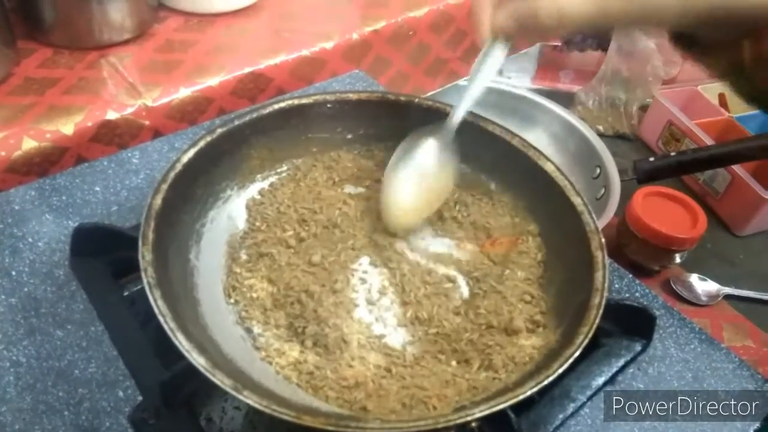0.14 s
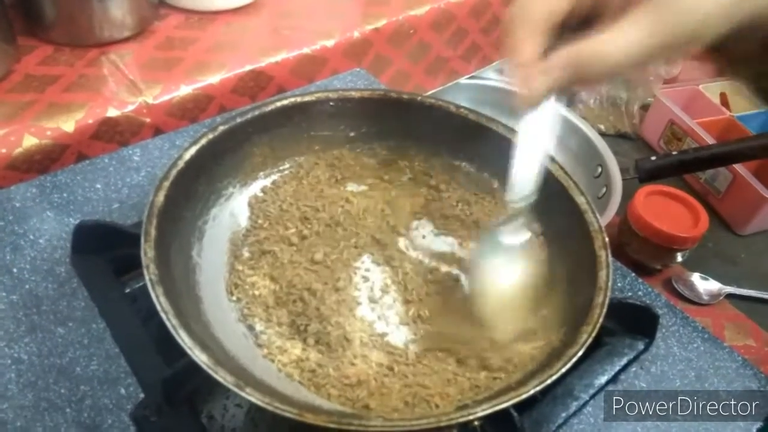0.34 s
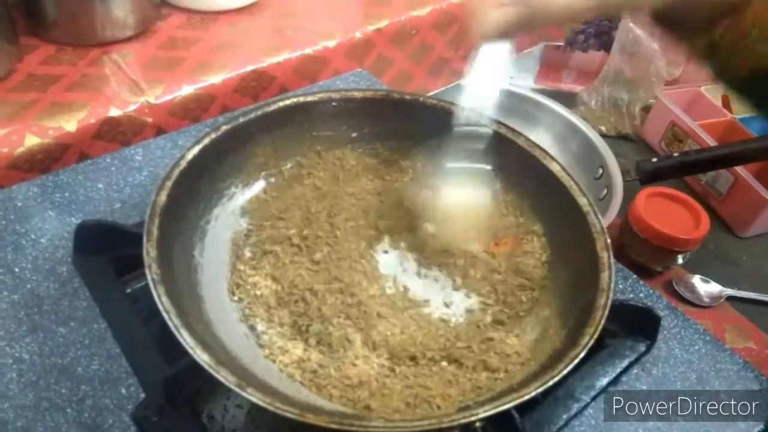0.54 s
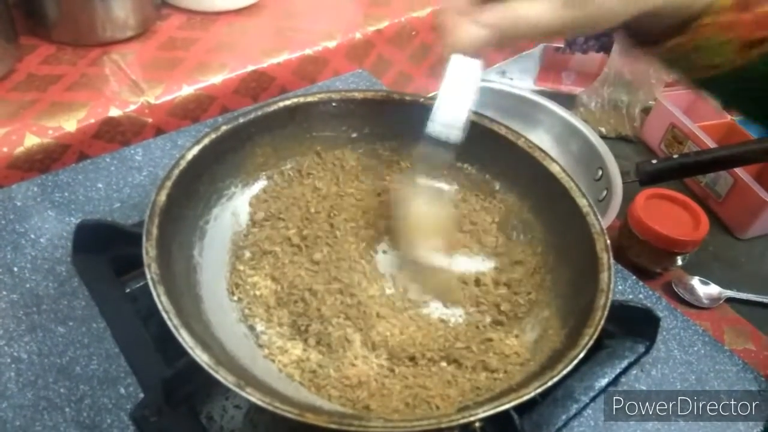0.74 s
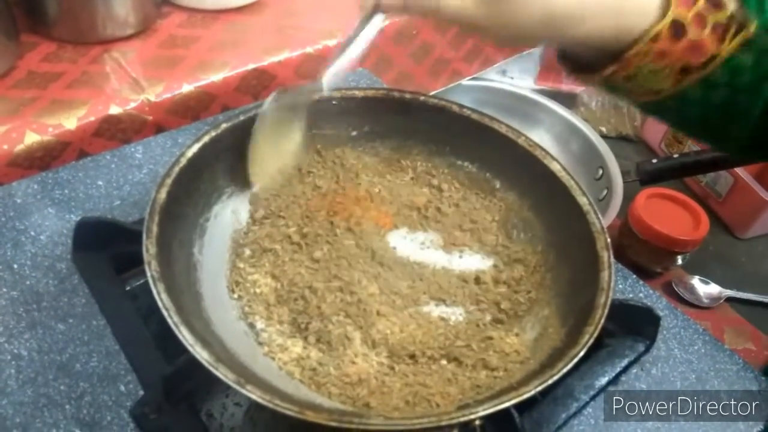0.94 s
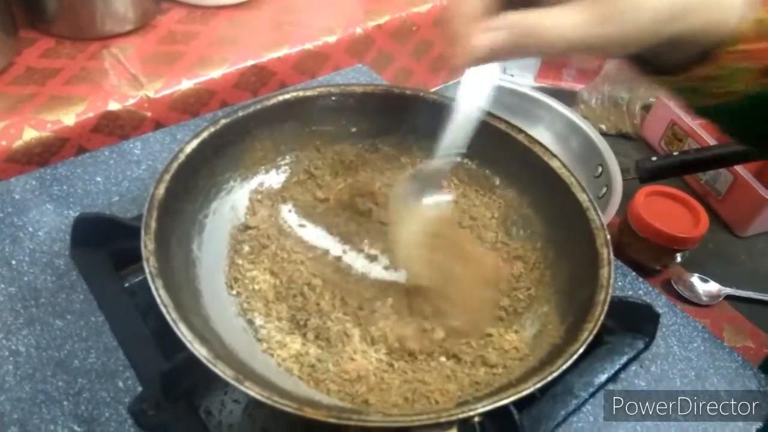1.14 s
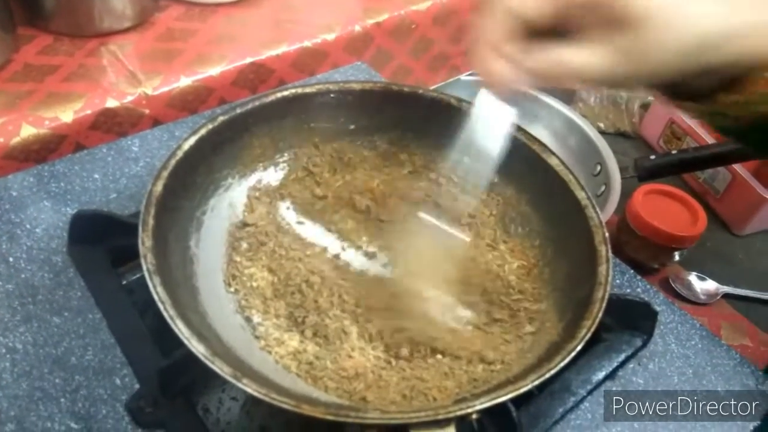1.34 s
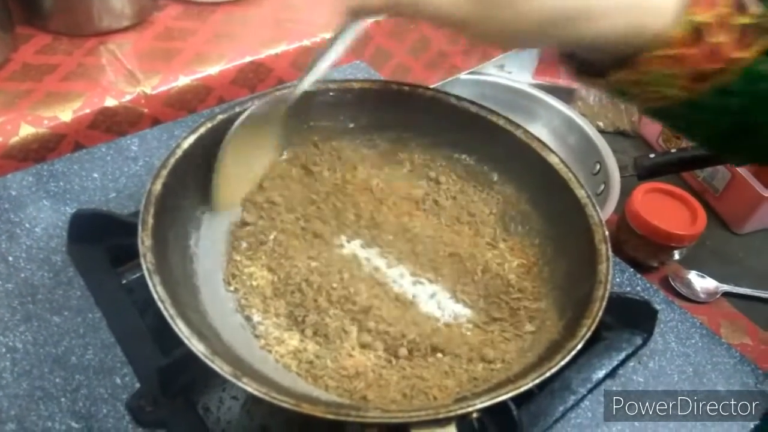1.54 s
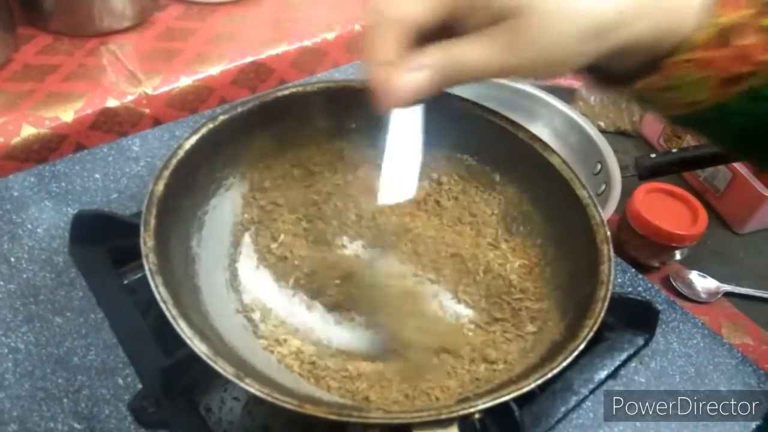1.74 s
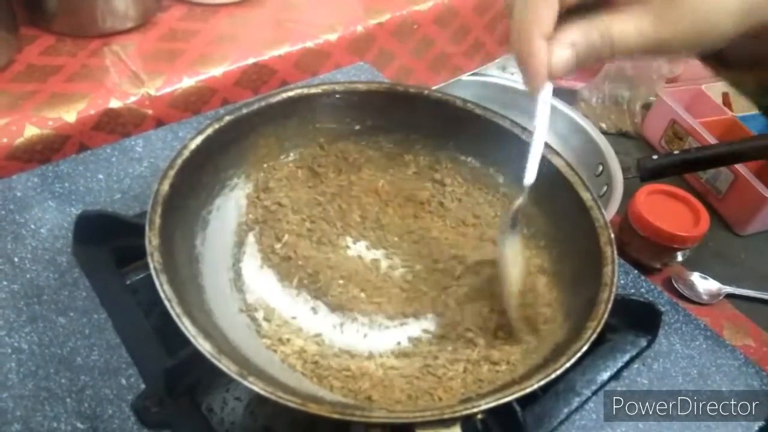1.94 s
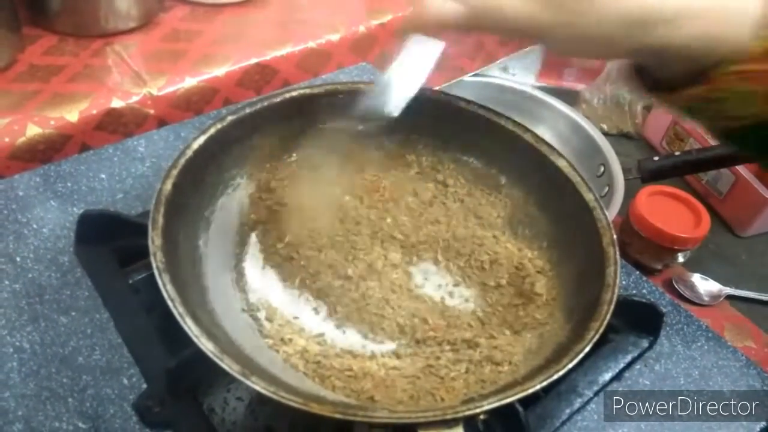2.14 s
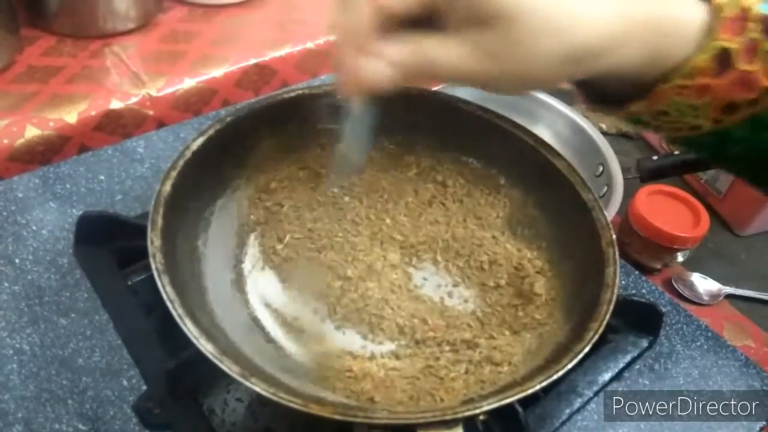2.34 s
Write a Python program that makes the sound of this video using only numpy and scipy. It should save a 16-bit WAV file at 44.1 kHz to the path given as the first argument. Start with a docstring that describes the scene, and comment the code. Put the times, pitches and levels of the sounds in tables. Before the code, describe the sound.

Close up, a steel spoon stirs dry spices in a pan: raspy scrapes, dull knocks, one bright clink and faint grainy rustle, with near-silent gaps over very low stove rumble and short room echo.

```python
"""Stirring spices in a frying pan

A steel spoon stirs dry spices round a small pan, about three strokes a second: random slips scrape over grit.
Knocks are decaying clinks and noise bursts, snaps are short noise bursts, and pushed seeds are random clicks.
Decaying sines ring the pan and spoon, and noise tails make a small kitchen.
Filtered noise rumbles as the stove; a noise gate ducks the quiet gaps."""
import sys
import numpy as np
from scipy import signal
from scipy.fft import rfft, irfft
from scipy.io import wavfile

SR = 44100
rng = np.random.default_rng(int(sys.argv[2]) if len(sys.argv) > 2 else 0)


def dump(signal):
    """Clip the signal to [-1, 1] and save it as 16-bit WAV at the path in sys.argv[1]."""
    limited = np.clip(np.atleast_2d(signal).T, -1, 1)
    pcm = np.round(limited * 32767).astype(np.int16)
    wavfile.write(sys.argv[1], SR, pcm)


N = 105840  # length [samples]

# Resonances of the hand-damped spoon: (frequency [Hz], relative level [dB], t60 [s])
SPOON_RESONANCES = [(780, -10, .03), (1830, -3, .02), (2550, -5, .014), (3130, 0, .014), (3740, -4, .013),
                    (5400, -8, .03), (5700, -2, .02), (6390, -8, .025), (6555, -7, .03), (8100, -8, .012),
                    (10200, -9, .008)]
# Bright spectrum of grit under the edge: (frequency [Hz], relative level [dB])
GRIT_SPECTRUM = [(1200, -34.5), (1800, -12.5), (2600, -1.5), (4000, 4), (4600, -4), (5500, -1.5), (8200, 0),
                 (9300, -13), (10500, -10), (12000, -23.5), (15500, -27)]
# Middle spectrum, for scrape body and clack: (frequency [Hz], relative level [dB])
BODY_SPECTRUM = [(300, -14), (560, 6.5), (780, 11), (1050, 12), (1400, -6.5), (1800, 6.5), (2400, -20.5),
                 (4000, -32)]
# Low spectrum, for scrape thrum and boom: (frequency [Hz], relative level [dB])
THRUM_SPECTRUM = [(80, -24.5), (170, -8), (255, -12.5), (320, -5), (480, -11), (650, -8.5), (1200, -24.5),
                  (3000, -25)]


def scrapes(pan):
    """The edge grinds over grit: dense slips excite the spoon and the pan."""
    # Scrapes: (start [s], swell [s], hold [s], fade [s], grit [dB], body [dB], thrum [dB]), levels relative
    strokes = [(-.03, 0.0074, 0.019, .06, -48, -42.5, -53), (0.199, 0.012, .083, .012, -36.5, -57, -64),
               (0.532, 0.029, 0.022, .05, -35.5, -45.5, -45.5), (0.825, 0.026, 0.014, .02, -44, -63, -56.5),
               (0.872, 0.0056, 0.0067, .025, -30.5, -60, -63),
               (0.88, 0.013, 0.0089, 0.091, -34, -44.5, -45), (1.122, 0.043, 0.072, .05, -37.5, -48, -50),
               (1.478, 0.04, 0.02, 0.042, -38, -55, -55.5), (1.779, 0.0032, .025, .02, -48, -60, -50.5),
               (1.803, 0.012, 0.026, 0.09, -29, -39.5, -66), (1.833, 0.02, 0.029, .04, -25.5, -40.5, -58),
               (1.879, 0.019, 0.027, 0.021, -27.5, -38.5, -76),
               (2.139, 0.041, 0.021, .05, -40.5, -57.5, -45)]
    swell_range_db = 28.5  # rise over the swell, and fall over each fade time
    contact_shift = 0.029  # spread of the spoon's relative detuning as the contact moves
    spoon_in_grit_db, spoon_in_body_db = -3, -6.5
    pan_in_grit_db, pan_in_body_db, pan_in_thrum_db = -19.5, -12, -3
    t = clock()
    slips = grains(9000, 0.5) * judder()
    grit, body, thrum = 0, 0, 0
    shifts = contact_shift * rng.standard_normal(len(strokes))
    for (start, swell, hold, fade, grit_db, body_db, thrum_db), shift in zip(strokes, shifts):
        before_hold = np.maximum((start + swell - t) / swell, 0)
        after_hold = np.maximum((t - start - swell - hold) / fade, 0)
        force = slips * undb(-swell_range_db * (before_hold + after_hold)) * (t > start)
        spoon = through(force, ring(SPOON_RESONANCES, shift))
        grit = grit + undb(grit_db) * (force + undb(spoon_in_grit_db) * spoon) / 2
        body = body + undb(body_db) * (force + undb(spoon_in_body_db) * spoon) / 2
        thrum = thrum + undb(thrum_db) * force / 2
    layers = [(grit, GRIT_SPECTRUM, pan_in_grit_db),
              (body, BODY_SPECTRUM, pan_in_body_db),
              (thrum, THRUM_SPECTRUM, pan_in_thrum_db)]
    out = 0
    for drive, spectrum, pan_db in layers:
        out = out + colour(drive + undb(pan_db) * through(drive, pan), spectrum)
    return out


def judder():
    """Quick uneven catching and slipping of the spoon's edge."""
    rate_hz, spread_db = 127.1, 2.5
    wander = np.interp(clock() * rate_hz, np.arange(N), rng.standard_normal(N))
    return unit(undb(spread_db * wander))


def knocks(pan):
    """A steel clink with one bounce, a clack and the pan's boom; spices cushion softer landings."""
    # Spoon landings: (time [s], boom [dB], clack [dB], tick [dB], hardness as low-pass corner [Hz])
    landings = [(0.3063, -33.5, -36, -39.5, 2760), (0.4924, -26, -25, -21, 12400),
                (0.796, -42, -59.5, -57.5, 2960), (1.1151, -39.5, -43.5, -44.5, 4170),
                (2.1075, -34, -71, -65.5, 4000)]
    # Clink of steel on the pan: (frequency [Hz], relative level [dB], t60 [s])
    clink_modes = [(2450, -2, .008), (3280, 1, .008), (5400, -5, .004), (7600, 0, .005), (8150, 0, .005),
                   (11900, -16, .008)]
    # Spectrum of the crack in the tick: (frequency [Hz], relative level [dB])
    tick_spectrum = [(600, -23.5), (1800, -13), (2600, 5.5), (3300, 3.5), (4500, 0.5), (6200, -15),
                     (8100, 6.5), (9200, -8.5), (12000, -11.5), (15500, -23.5)]
    boom_t60_s, clack_t60_s, crack_t60_s = 0.02, 0.12, 0.0044
    boom_rise_s, clack_rise_s, contact_rise_s = .005, 0.0012, 0.00022
    pan_in_boom_db, pan_in_clack_db, pan_in_crack_db = 5.5, 0, -10
    crack_db, bounce_db, bounce_s = -6, -0.5, 0.004
    level_span_s = .01  # a knock of energy 1 becomes rms 1 over this span
    clink = ring(clink_modes)
    out = 0
    for s, boom_db, clack_db, tick_db, hard_hz in landings:
        boom = noise_burst(boom_t60_s) + undb(pan_in_boom_db) * pan
        boom = soften(colour(boom, THRUM_SPECTRUM), boom_rise_s)
        clack = noise_burst(clack_t60_s) + undb(pan_in_clack_db) * pan
        clack = soften(cut(colour(clack, BODY_SPECTRUM), hard_hz, "low"), clack_rise_s)
        crack = colour(noise_burst(crack_t60_s) + undb(pan_in_crack_db) * pan, tick_spectrum)
        tick = soften(clink + undb(crack_db) * crack, contact_rise_s)
        tick = norm(cut(cut(tick, hard_hz, "low"), hard_hz, "low"))
        tick = tick + undb(bounce_db) * late(tick, bounce_s)
        knock = undb(boom_db) * boom + undb(clack_db) * clack + undb(tick_db) * tick
        out = out + late(knock, s)
    return cut(out, 83, "high") * np.sqrt(level_span_s * SR)


def soften(x, rise_s):
    """Let a response build up while the contact lasts, then scale to energy 1."""
    return norm(x * (1 - np.exp(-(clock() / rise_s) ** 2)))


def snaps():
    """A single grain catches under the edge and gives way: a brief burst of slips rings the spoon."""
    # Snaps: (time [s], relative level [dB])
    catches = [(0.212, -37), (0.282, -40.5), (0.574, -29), (1.505, -52), (1.514, -41.5), (1.828, -25),
               (1.857, -23), (1.905, -52), (2.103, -54)]
    burst = fall(.02)
    envelope = sum(undb(db) * late(burst, s) for s, db in catches)
    force = envelope * rng.standard_normal(N)
    return colour(force + through(force, ring(SPOON_RESONANCES)), GRIT_SPECTRUM)


def seeds():
    """Seeds and powder tumble while the bowl of the spoon pushes them."""
    # Pushes: (start [s], length [s], level [dB])
    pushes = [(0.288, 0.14, -55), (0.53, 0.12, -44), (0.792, 0.19, -50), (1.107, 0.15, -55),
              (1.452, 0.175, -60.5), (1.778, 0.215, -58.5), (2.09, 0.15, -58)]
    # Spectrum of the tumbling: (frequency [Hz], relative level [dB])
    seed_spectrum = [(90, -18), (250, 2.5), (500, -1), (1000, -10), (2000, -11.5), (4000, -19),
                     (8000, -25.5), (15000, -40.5)]
    edge_s = .014  # ramp centred on each start and end
    t = clock()
    push = 0
    for start, length, db in pushes:
        inside = np.minimum(t - start, start + length - t)
        push = push + undb(db) * np.clip(inside / edge_s + .5, 0, 1)
    return colour(push * grains(2600, 2), seed_spectrum)


def kitchen(x):
    """Short reverberation of hard walls, stronger and longer in the bass."""
    bass_t60_s, treble_t60_s = .42, .28
    bass_db, treble_db, delay_s = -4, -9, .004
    bass = cut(noise_burst(bass_t60_s), 1200, "low")
    treble = cut(noise_burst(treble_t60_s), 1700, "high")
    tail = undb(bass_db) * bass + undb(treble_db) * treble
    return x + through(x, late(tail, delay_s))


def stove():
    """The stove's steady rumble: white noise through a bass-heavy spectrum."""
    # Spectrum of the rumble: (frequency [Hz], relative level [dB])
    stove_spectrum = [(25, -29.5), (55, -18.5), (85, -0.5), (130, 2), (170, -17.5), (260, -13), (500, -19),
                      (1200, -24), (4000, -30.5), (15000, -49)]
    return undb(-55) * colour(rng.standard_normal(N), stove_spectrum)


def pan_ringing():
    """Impulse response of the pan: its modes die away as decaying sines."""
    # Ringing of the pan: (frequency [Hz], relative level [dB], t60 [s])
    pan_modes = [(260, 6, .24), (378, -3, .14), (472, 1, .12), (501, -2, .18), (640, -8, .1),
                 (770, -7, .13), (950, -14, .12), (1352, 2, .14), (1712, -4, .16), (2400, -9, .12),
                 (3028, -11, .12), (3293, -11, .12), (3686, -11, .12)]
    return ring(pan_modes)


def ring(modes, shift=0):
    """Impulse response of decaying modes, energy 1; shift detunes them all by a fraction."""
    t = clock()
    total = 0
    for hz, db, t60 in modes:
        total = total + undb(db) * fall(t60) * np.sin(2 * np.pi * hz * (1 + shift) * t)
    return norm(total)


def grains(rate_per_s, spread_db):
    """Random clicks of unequal size, rms 1."""
    hits = rng.random(N) < rate_per_s / SR
    sizes = undb(spread_db * np.clip(rng.standard_normal(N), -2, 2))
    return unit(hits * rng.standard_normal(N) * sizes)


def noise_burst(t60):
    """White noise that dies away exponentially, energy 1."""
    return norm(rng.standard_normal(N) * fall(t60))


def colour(x, points):
    """Causal minimum-phase filter with the given spectrum shape and unit gain for white noise."""
    hz, db = np.array(points).T
    bins_hz = np.fft.rfftfreq(N, 1 / SR)
    gain = undb(np.interp(np.log(bins_hz + 1), np.log(hz), db))
    # Folding the cepstrum onto positive time makes the response causal
    cepstrum = irfft(np.log(gain), N)
    cepstrum[1:N // 2] *= 2
    cepstrum[N // 2 + 1:] = 0
    response = irfft(np.exp(rfft(cepstrum)), N)[:N // 16]
    return through(x, norm(response))


def cut(x, hz, kind):
    """Second-order Butterworth filter, "low" or "high" pass."""
    corner_hz = min(hz, SR / 2 - 100)
    return signal.sosfilt(signal.butter(2, corner_hz, kind, fs=SR, output="sos"), x)


def through(x, response):
    """Excite a response with a signal by convolution."""
    return signal.fftconvolve(x, response)[:N]


def fall(t60):
    """Exponential decay by 60 dB in t60 seconds."""
    return np.exp(-np.log(1000) * np.minimum(clock() / t60, 10))


def late(x, s):
    """Delay by s seconds."""
    return np.concatenate([np.zeros(int(max(s, 0) * SR)), x])[:N]


def clock():
    """Time of each sample in seconds."""
    return np.arange(N) / SR


def undb(db):
    """Decibels to amplitude ratio."""
    return 10 ** (np.asarray(db) / 20)


def unit(x):
    """Scale to rms 1."""
    return x / np.sqrt(np.mean(x ** 2))


def norm(x):
    """Scale to energy 1."""
    return x / np.sqrt(np.sum(x ** 2))


def scene():
    """Spoon, pan and spices sound in the kitchen; the stove is added without reverberation."""
    pan = pan_ringing()
    stirring = scrapes(pan) + knocks(pan) + snaps() + seeds()
    return (kitchen(stirring) + stove())[None]


def record(dry):
    """A noise gate turns down whatever is quiet; a steep low-pass cuts the top."""
    threshold_db, depth_db, knee_db = -57.5, 15.5, 4.5
    smoothing_s = 0.0082  # time constant of the level detector
    top_hz = 15700
    keep = np.exp(-1 / (smoothing_s * SR))
    power = signal.lfilter([1 - keep], [1, -keep], cut(dry, 190, "high") ** 2)
    over_db = 10 * np.log10(np.abs(power) + 1e-14) - threshold_db
    shut = np.clip(.5 - over_db / knee_db, 0, 1)  # 0 open, 1 fully ducked
    gated = dry * undb(-depth_db * shut)
    return signal.sosfilt(signal.ellip(10, .2, 70, top_hz, fs=SR, output="sos"), gated)


dry = scene()
out = record(dry)
dump(out)
```